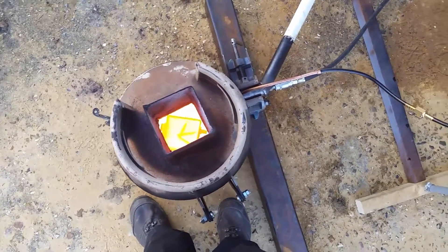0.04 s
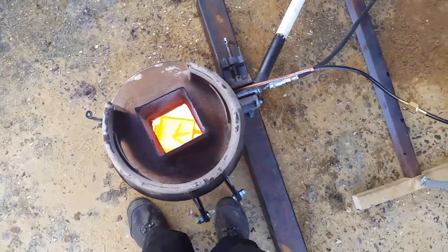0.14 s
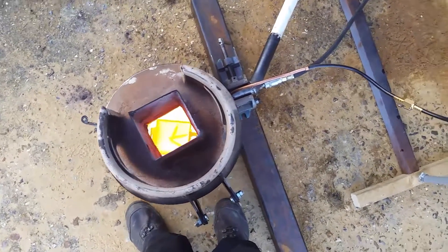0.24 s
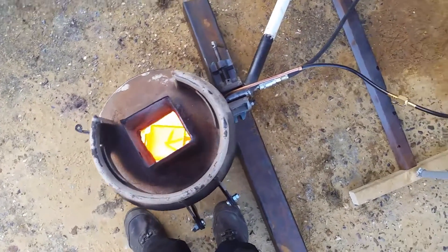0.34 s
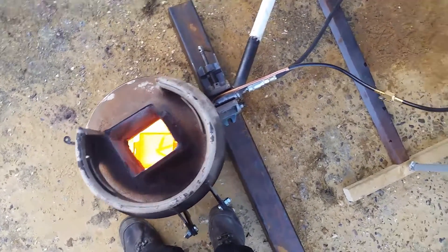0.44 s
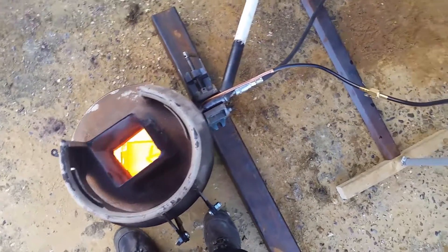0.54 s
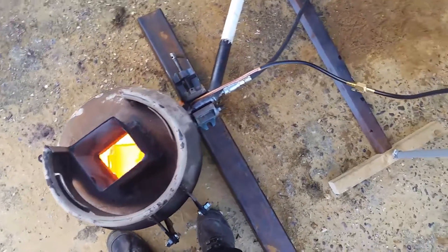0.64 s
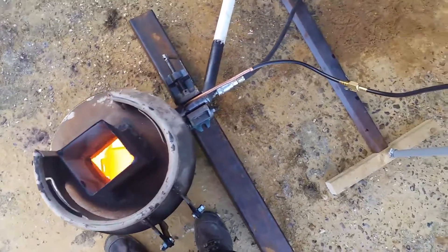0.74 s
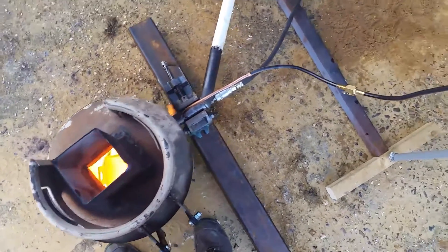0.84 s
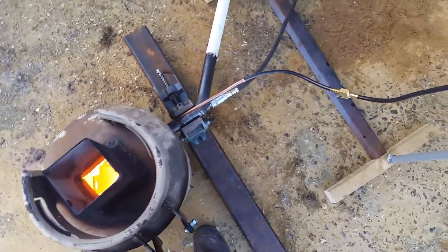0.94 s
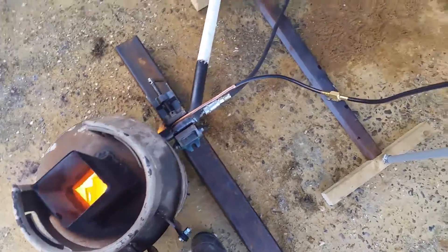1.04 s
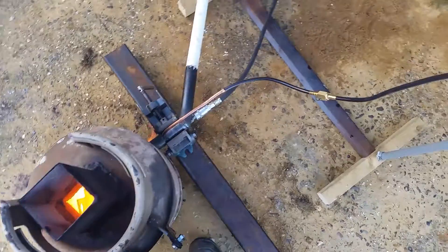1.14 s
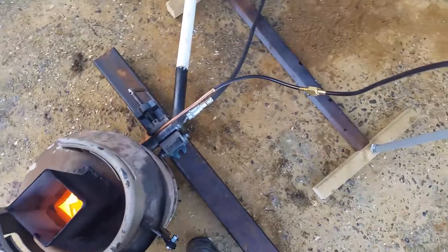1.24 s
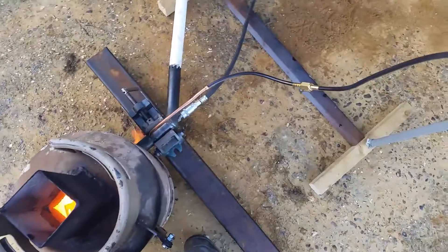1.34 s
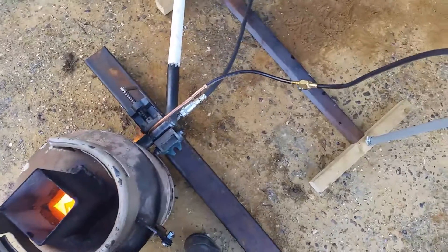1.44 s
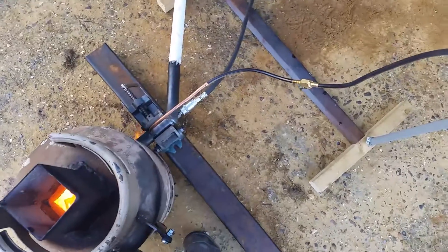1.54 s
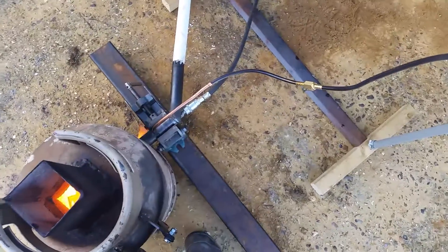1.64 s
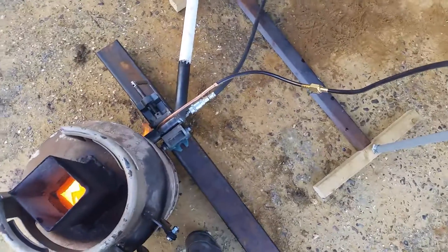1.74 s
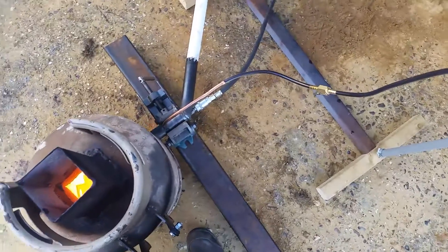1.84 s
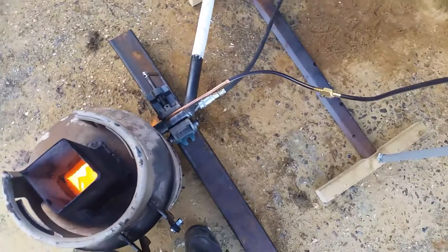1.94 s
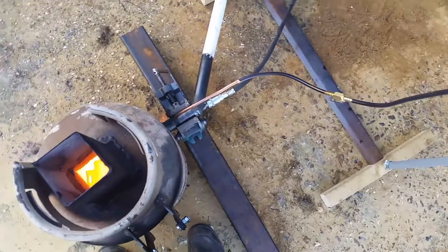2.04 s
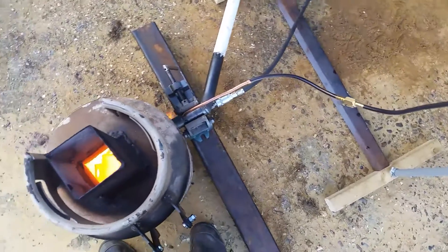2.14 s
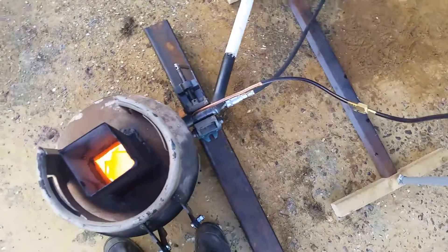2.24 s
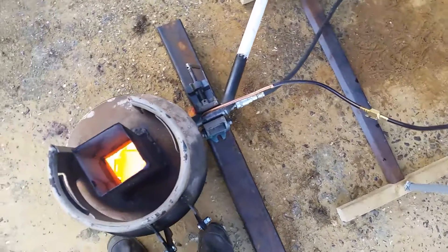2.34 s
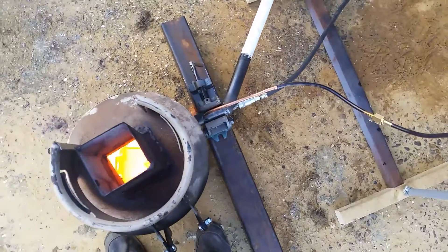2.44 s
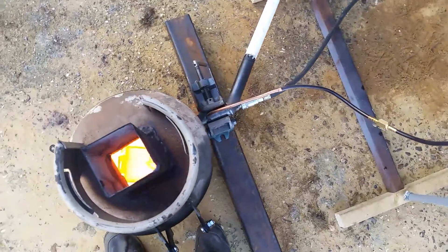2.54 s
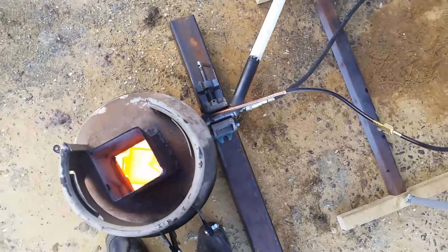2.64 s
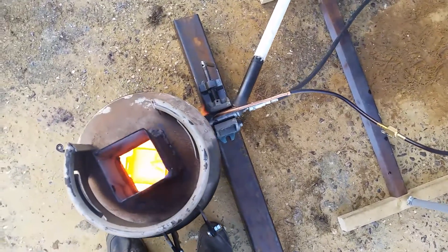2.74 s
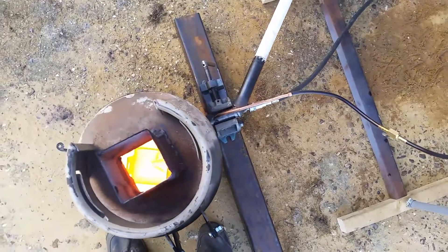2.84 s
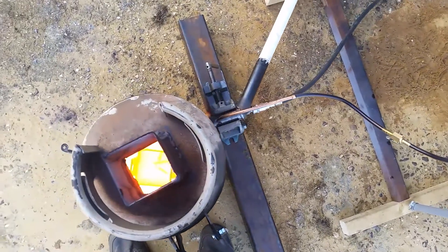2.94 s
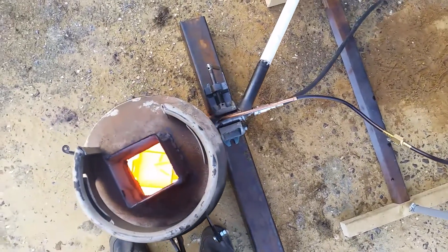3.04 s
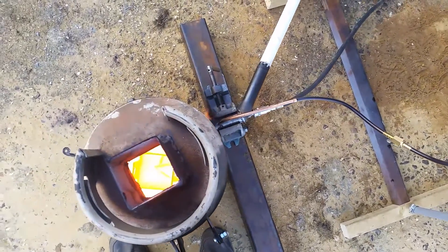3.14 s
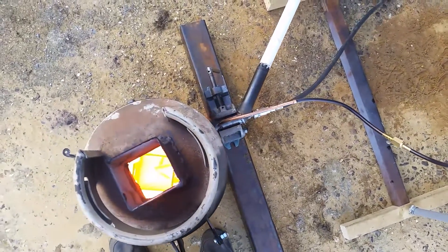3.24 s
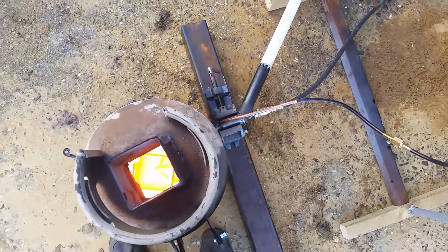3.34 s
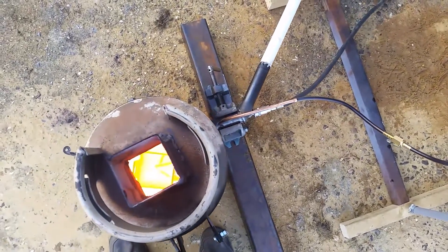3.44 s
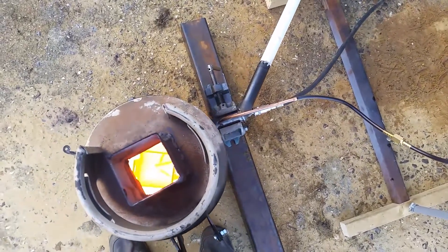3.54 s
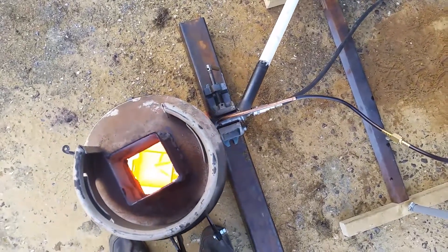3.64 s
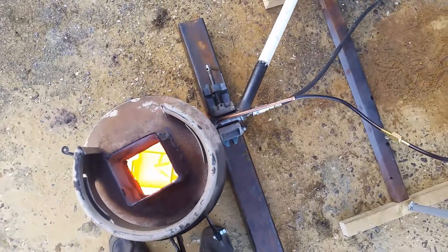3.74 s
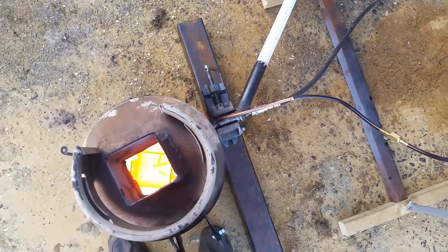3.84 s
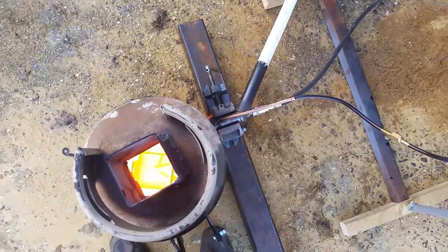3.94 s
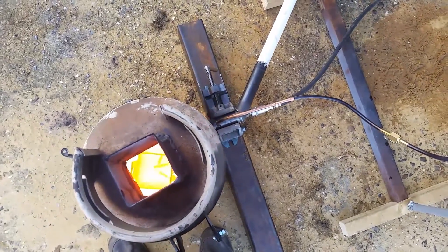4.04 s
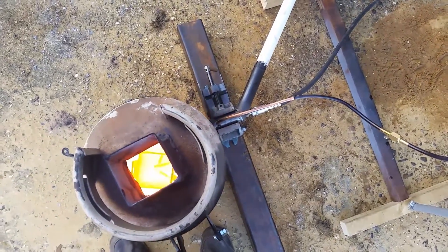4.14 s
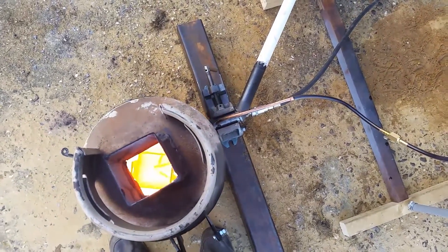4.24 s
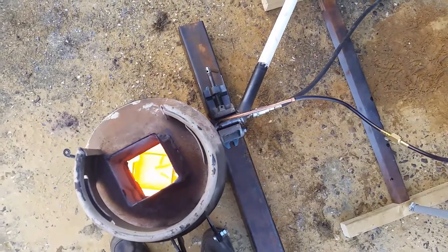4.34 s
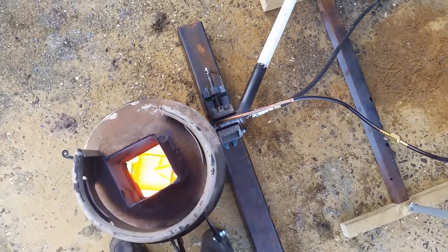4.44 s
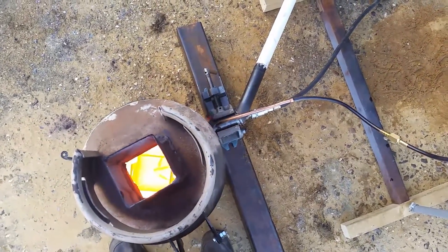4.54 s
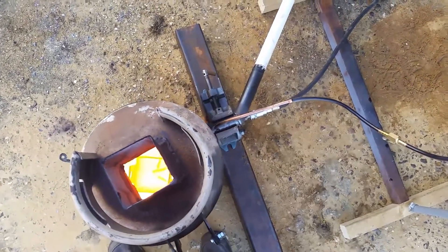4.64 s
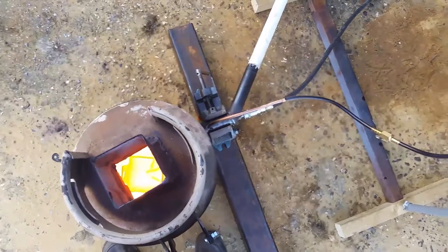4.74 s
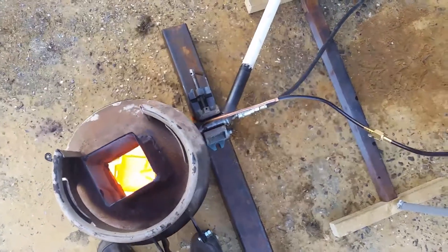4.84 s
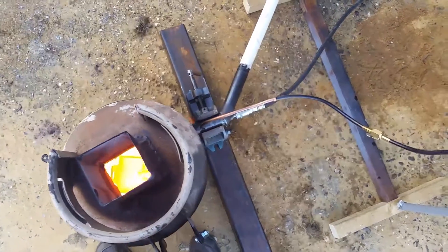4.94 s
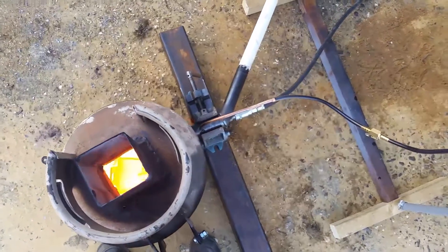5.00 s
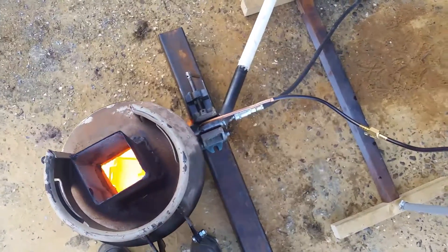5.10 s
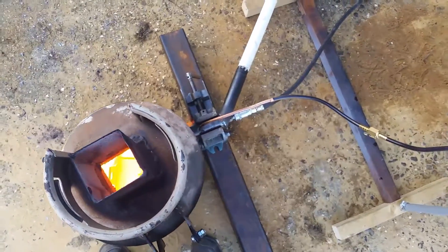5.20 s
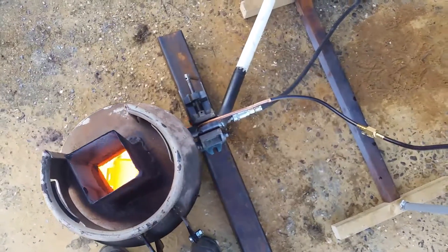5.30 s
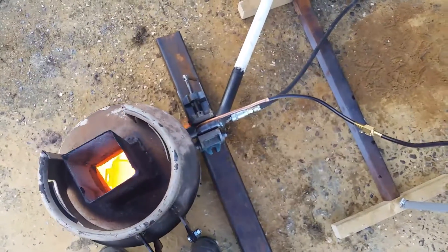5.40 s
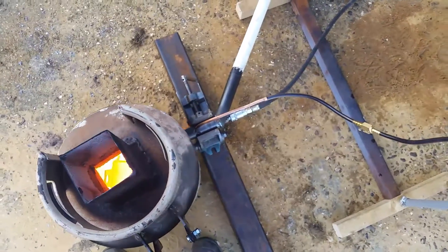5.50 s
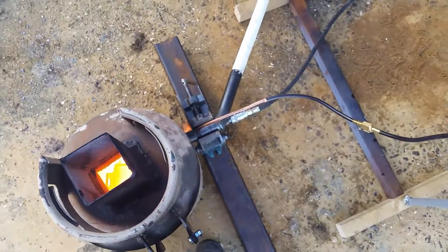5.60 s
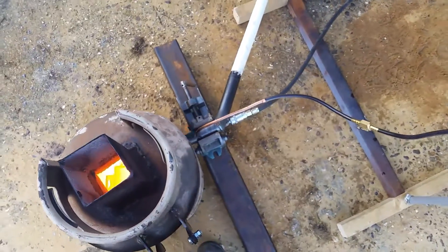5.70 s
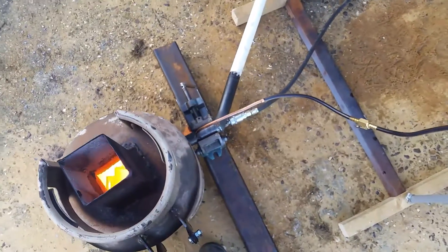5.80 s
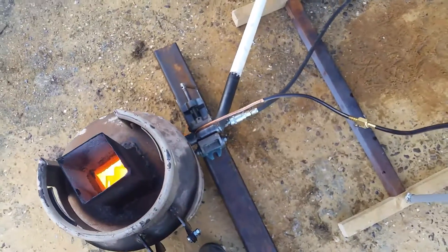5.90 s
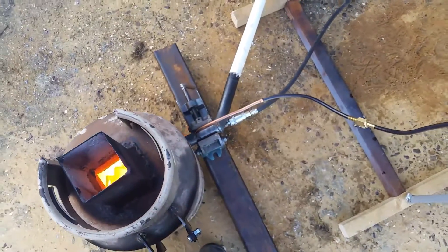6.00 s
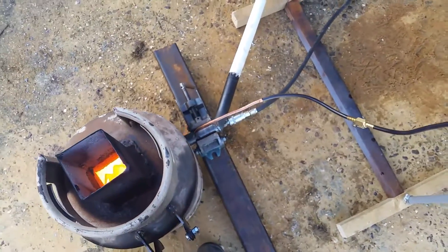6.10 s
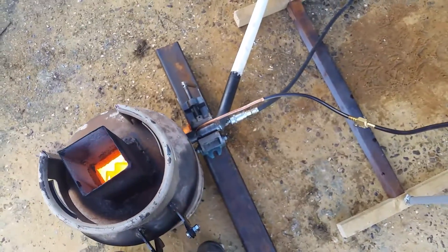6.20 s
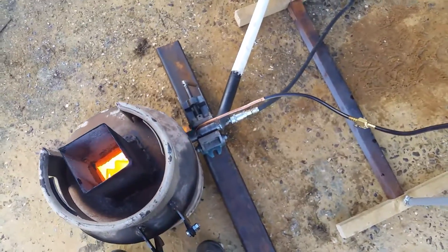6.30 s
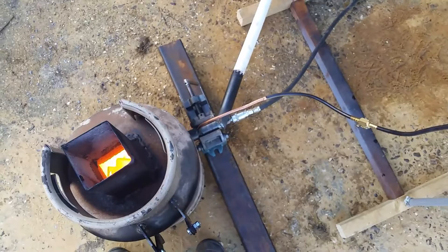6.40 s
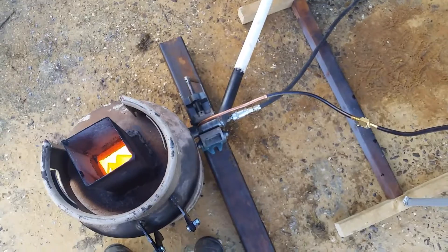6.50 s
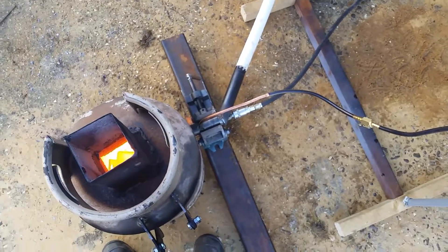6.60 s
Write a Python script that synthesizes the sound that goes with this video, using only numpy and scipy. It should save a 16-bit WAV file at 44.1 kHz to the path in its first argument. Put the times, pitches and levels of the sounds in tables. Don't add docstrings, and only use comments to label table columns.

```python
import sys
import numpy as np
from scipy import signal
from scipy.fft import rfft, irfft
from scipy.io import wavfile
from scipy.ndimage import uniform_filter1d

SR = 44100
rng = np.random.default_rng(int(sys.argv[2]) if len(sys.argv) > 2 else 0)


def elevation(decibels):
    levels = np.asarray(decibels, float)
    return 10 ** (levels / 20)


def wav_out(sig):
    wavfile.write(sys.argv[1], SR, np.round(np.clip(np.atleast_2d(sig).T, -1, 1) * 32767).astype(np.int16))


N = 293704


def evened(x):
    return x / np.sqrt(np.mean(x ** 2) + 1e-20)


def read(points, hz):
    f, *columns = np.transpose(points)
    at, known = np.log(hz + 1), np.log(f + 1)
    return np.array([np.interp(at, known, c, left=c[0], right=c[-1]) for c in columns])


def follow(rows, t):
    s, *columns = np.transpose(rows)
    return [np.interp(t, s, c) for c in columns]


def bumps(modes, hz):
    return sum(np.outer([left, right], 1 / (1 + (2 * (hz - f) / width) ** 2))
               for f, width, left, right in modes)


def wander(rate_hz, t, count=24):
    f = np.geomspace(rate_hz / 12, rate_hz, count)[:, None]
    waves = np.sin(2 * np.pi * (f * t + rng.random((count, 1))))
    return evened((waves / f ** 0.075).sum(0))


def passing(events, t):
    return sum(size_db * np.exp(-(2 * (t - s) / length) ** 2) for s, size_db, length in events)


def change(*levels_db):
    return np.array([level - level.mean() for level in levels_db])


def moved(layer, t):
    # time in seconds, overall level in dB, turn of the left port to the burner in dB
    hand_path = [(0, 0, -4), (.3, -1.5, -4.5), (.6, -0.5, -2.5), (.9, -2.5, -2.5), (1.15, -6.5, 2.5),
                 (1.45, -6.5, 5.5), (1.75, -2, 5.5), (2.0, -0.5, 5), (2.4, -0.5, 2), (2.9, -0.5, 1),
                 (3.4, 0, 0.5), (3.8, -0.5, 0.5), (4.2, -1, 0.5), (4.6, -1, 0.5), (5.0, -1.5, -2),
                 (5.5, -.5, 1.5), (6.1, -1, 4.5), (6.66, -1, 6.5)]
    # dB per dB of overall level, dB per dB of turn
    level_share = dict(roar=(1.02, .99), deep=(.5, .5), air=(1, 1), top=(.1, 0.2), hiss=(0.95, 1.03),
                  fizz=(.1, .1), blade=(.1, .1))
    turn_share = dict(roar=(-0.06, -.05), deep=(-.3, -0.27), air=(.4, 0.14), top=(0.25, -0.12),
                  hiss=(0.84, -.05), fizz=(0.22, .05), blade=(0.65, -.1))
    overall_db, turn_db = change(*follow(hand_path, t))
    return np.outer(level_share[layer], overall_db) + np.outer(turn_share[layer], turn_db)


def grid(size):
    return np.arange(4 * N // size + 5) * size / 4 / SR, np.fft.rfftfreq(size, 1 / SR)


def turbulence(field_db, size, patch_db, bins, frames):
    # frequency in Hz, likeness from 0 to 1
    port_likeness = [(30, 0.32), (60, 1), (150, 1), (450, 1), (600, 1), (850, 0.91), (1100, 0.7),
                     (2000, 0.3), (4000, 0.24), (16000, 0.38)]
    # frequency in Hz, lag of the right port in radians
    port_phase = [(30, 1.5), (100, 0.24), (300, 0.37), (600, -1.07), (1500, 0.99), (2200, 0.5), (3000, 2.5),
                  (4000, 2.5), (5000, 4), (7000, -0.5), (10000, 5.5), (16000, -4.5)]
    hz = grid(size)[1]
    a, b, c, d, patch = rng.standard_normal(field_db.shape[:0:-1] + (5,)).T
    patch = evened(uniform_filter1d(uniform_filter1d(patch, bins, 0), frames, 1))
    same = np.clip(read(port_likeness, hz)[0], 0, 1)[:, None]
    left = a + 1j * b
    shared = same * left * np.exp(-1j * read(port_phase, hz)[0])[:, None]
    right = shared + np.sqrt(1 - same ** 2) * (c + 1j * d)
    z = np.array([left, right]) * elevation(field_db + patch_db * patch) * np.sqrt(2 * SR / size)
    return signal.istft(z, nperseg=size, noverlap=3 * size // 4)[1][:, :N]


def flame():
    # frequency in Hz, left and right level in dB per Hz
    roar_spectrum = [(24, -72, -74), (42, -81, -79), (67.1, -39, -45), (86, -38, -39.5),
                     (137, -34.5, -38.5), (194, -37, -41), (261, -39, -43), (334, -46.5, -50),
                     (387.5, -54, -57.5), (565, -62, -62), (700, -73, -91), (900, -67.5, -78)]
    # frequency in Hz, width in Hz, left and right lift in dB
    chamber_modes = [(60, 14, 2, 2), (72, 12, -4, -4), (101, 9, -4, -4), (112, 10, 3.5, 3.5),
                     (124, 10, -4, -4), (137, 14, 2.5, 2.5), (152, 9, -4, -4), (172, 10, -4, -4),
                     (186, 11, 5, 5), (200, 10, -5, -5), (226, 25, -.5, -.5), (296, 12, -3, -3)]
    # time in seconds, swell in dB, length in seconds
    buffets = [
        (.3, 6, 0.23),
        (.67, 4, .1),
        (3.6, 11, .15),
        (4.2, 8, .25),
        (4.66, 8, .12),
        (4.9, -1, .2),
        (5.2, 8, 0.4),
    ]
    # time in seconds, swell in dB, length in seconds
    roar_dips = [
        (.73, -10, 0.04),
    ]
    pipe_s, pipe_echo = .0200, .2
    t, hz = grid(2048)
    deep_db = moved("deep", t) + passing(buffets, t) + 2.5 * wander(5, t)
    deep = np.clip((90 - hz) / 40, 0, 1)[:, None] * deep_db[:, None]
    shape_db = read(roar_spectrum, hz) - 60 * (hz > 1000)
    steady = turbulence(shape_db[:, :, None] + deep, size=2048, patch_db=0.96, bins=3, frames=4)
    f = np.fft.rfftfreq(N, 1 / SR)
    returned = pipe_echo * np.exp(-((f - 190) / 170) ** 2) * np.exp(-2j * np.pi * f * pipe_s)
    pipe = (1 - returned) * elevation(bumps(chamber_modes, f))
    now = np.arange(N) / SR
    flicker_db = np.interp(now, t, 0.28 * wander(5, t))
    level_db = moved("roar", now) + passing(roar_dips, now) + flicker_db
    return irfft(rfft(steady) * pipe, N) * elevation(level_db - 1.06)


def blower_air():
    # frequency in Hz, left and right level in dB per Hz
    air_spectrum = [(497, -83, -80), (720, -66.5, -67.5), (830, -64.5, -64), (950, -66.5, -64),
                    (1450, -72.5, -70), (1710, -72.5, -68.5), (2006, -71, -58), (1976, -77.5, -60),
                    (2137, -68.5, -72.5), (2550, -71.5, -69), (2630, -72.5, -72.5), (3730, -86, -72),
                    (3740, -77, -77.5), (4500, -102, -77)]
    # frequency in Hz, width in Hz, left and right lift in dB
    duct_notches = [(2540, 100, -14, -8.5), (3150, 270, 0, -3.5)]
    # time in seconds, swell in dB, length in seconds
    draughts = [
        (2.05, 0, 0.22),
        (3.15, 0.5, 0.17),
        (4.75, 0, .25),
        (6.3, 1, 0.26),
    ]
    # time in seconds, swell in dB, length in seconds
    wisps = [
        (.3, -2.5, 0.63),
        (3.15, 1.5, .25),
        (4.65, -1, 0.13),
        (5.3, 2.5, 0.39),
    ]
    t, hz = grid(512)
    port_drift = np.array([wander(3.3, t), wander(3, t)])
    moving = moved("air", t) + passing(draughts, t) + 0.74 * wander(25, t) + 0.35 * port_drift
    top_db = moved("top", t) + passing(wisps, t) * np.array([[.2], [1]]) + 0.57 * wander(2.7, t)
    top = np.clip((hz - 2200) / 400, 0, 1)[:, None] * top_db[:, None]
    outside = (hz < 400) | (hz > 4700)
    shape_db = read(air_spectrum, hz) + bumps(duct_notches, hz) - 60 * outside
    field_db = shape_db[:, :, None] + moving[:, None] + top
    return turbulence(field_db, size=512, patch_db=0.53, bins=3, frames=20)


def jet():
    # frequency in Hz, left and right level in dB per Hz
    hiss_spectrum = [(3670, -85, -85.5), (4430, -87, -70.5), (4650, -105, -69.5), (5080, -106, -64.5),
                     (5700, -107, -73), (6320, -93, -67.5), (6470, -79, -66.5), (7100, -84, -76),
                     (7450, -70.5, -75), (8760, -79.5, -74.5), (11400, -76.5, -73), (12600, -73, -76.5),
                     (14400, -76, -75), (16400, -70, -75)]
    # frequency in Hz, width in Hz, left and right lift in dB
    port_modes = [(5430, 270, 1, 4.5), (8250, 330, 7, -2.5), (10610, 1140, 3, 8.5), (13400, 220, -1, -1),
                  (13580, 220, -5, -4), (14300, 300, 4, 3.5)]
    # time in seconds, swell in dB, length in seconds
    shades = [(.11, -6, 0.11), (.56, 8, 0.1), (.8, -2, 0.091), (1.0, -6, .12), (3.0, -3, .06),
              (3.75, -5, 0.15), (4.03, -3, 0.074), (4.2, -2, 0.073), (4.44, -10, .12), (4.88, -1, .1),
              (5.1, -2, .1), (5.44, 0, .1), (5.85, -5, 0.17)]
    # time in seconds, swell in dB, length in seconds
    spits = [
        (.22, 4, 0.16),
        (.45, 1.5, 0.052),
        (2.7, 0.5, .15),
        (3.1, 1.5, 0.092),
        (3.9, 2.5, 0.2),
        (4.05, -2.5, 0.076),
        (4.45, 1, 0.34),
        (5.22, 4, 0.25),
    ]
    # time in seconds, swell in dB, length in seconds
    fizzes = [
        (.2, 7, .2),
        (2.7, 2, .12),
        (1.85, 2, .2),
        (4.1, -1, .2),
        (4.6, 1, .1),
        (5.2, 3, .08),
        (5.33, 5, .1),
        (5.55, 5, .12),
        (5.75, 5, .08),
        (6.6, 4, .1),
    ]
    # time in seconds, level in dB
    whistle_level = [(0, -26), (.25, -41), (.5, -36), (.85, -34.5), (1.2, -44), (1.55, -36.5), (1.9, -34),
                     (2.35, -34), (2.6, -43), (2.9, -32), (3.5, -33), (4.3, -32), (4.7, -36), (5.0, -38),
                     (5.2, -34), (5.55, -41), (6.1, -31.5), (6.66, -37)]
    whistle_hz = 6256
    ground_s, ground_echo = .0019, 0.17
    t, hz = grid(512)
    fizz_db = moved("fizz", t) + passing(fizzes, t) * np.array([[1], [.6]])
    sputter = 0.62 * wander(60, t) + 0.67 * np.array([wander(40, t), wander(40, t)])
    flares = np.array([passing(shades, t), passing(spits, t)])
    moving = moved("hiss", t) + flares + sputter + 0.75 * wander(7, t)
    fizz = np.clip((hz - 11000) / 1500, 0, 1)[:, None] * fizz_db[:, None]
    path_s = ground_s * (1 + 0.025 * np.array([wander(1.51, t), wander(1.5, t)]))
    echo = ground_echo * np.exp(2j * np.pi * hz[:, None] * path_s[:, None])
    comb_db = 20 * np.log10(abs(1 + echo))
    shape_db = read(hiss_spectrum, hz) + bumps(port_modes, hz) - 60 * (hz < 3600)
    field_db = shape_db[:, :, None] + moving[:, None] + fizz + comb_db
    hiss = turbulence(field_db, size=512, patch_db=1.17, bins=8, frames=8)
    b, a = signal.iirpeak(whistle_hz, whistle_hz / 150, SR)
    breath = rng.standard_normal((N, 2)).T
    whistle = evened(signal.lfilter(b, a, signal.lfilter(b, a, breath)))
    level_db = follow(whistle_level, t)[0] + 1.5 * wander(30, t) + 1.66 * wander(7, t)
    height = np.interp(np.arange(N) / SR, t, elevation(level_db))
    return hiss + whistle * height * elevation([[-17], [-.7]])


def blower_tones():
    # time in seconds, blade tone in dB, motor slot tone in dB
    rotor = [(0, -46, -44), (.3, -44.5, -41), (.6, -40.5, -44), (.9, -43.5, -70), (1.4, -42.5, -62),
             (1.8, -37, -59), (2.2, -37, -48.5), (2.8, -38.5, -48), (3.1, -41, -46.5), (3.7, -40.5, -46),
             (4.4, -43, -45), (5.0, -42.5, -47), (5.5, -37.5, -50), (6.1, -37, -51), (6.66, -37.5, -51)]
    orders = [.5556, 1, 1.2219, 1.831, 1.890, 2, 2.1925, 2.2219, 2.3327, 2.382, 2.4375, .7778, 5.610, 5.777]
    order_levels = [(-1.5, -6.5), (4.5, 3), (-9, -15), (-16, -10), (-25, -9), (-14, -3), (-25, -13),
                    (-2, 3), (-25, -9), (-19, -12), (-18, -12), (-8, -12), (-28, -8), (-28, -10)]
    blade_hz, blade_left_db = 928.9, -5
    slot_index = 7
    t, out = np.arange(N) / SR, np.zeros((2, N))
    coarse = t[::256]
    blade_db, slot_db = follow(rotor, coarse)
    blade_db = blade_db + moved("blade", coarse) + [[blade_left_db], [0]]
    for k, (order, port_db) in enumerate(zip(orders, order_levels)):
        for port in range(2):
            level_db = slot_db if k == slot_index else blade_db[port]
            waver = wander(9, coarse)
            height = np.interp(t, coarse, np.sqrt(2) * elevation(level_db + port_db[port] + 1.77 * waver))
            slip = np.interp(t, coarse, 0.16 * waver + 1.0 * port + k)
            out[port] += height * np.sin(2 * np.pi * order * blade_hz * t + slip)
    return out


def squeak():
    # time in seconds, pitch in Hz, level in dB
    skid = [
        (.7115, 1500, -45),
        (.7130, 1500, -22),
        (.7190, 1630, -16),
        (.7235, 1540, -18),
        (.7265, 1480, -30),
        (.7300, 1450, -50),
    ]
    t = np.arange(N) / SR
    hz, level_db = follow(skid, t)
    judder = evened(uniform_filter1d(rng.standard_normal(N), size=60))
    turns = np.cumsum(hz * (1 + .04 * judder)) / SR + np.array([[0], [.22]])
    touching = abs(t - .72) < .011
    return elevation(level_db + np.array([[-1.5], [.7]])) * np.sin(2 * np.pi * turns) * touching


def creak():
    # time in seconds, level in dB, ring in Hz, snap in dB over the ring
    slips = [(.7125, -24, 1450, 19), (.716, -19, 2420, 8), (.719, -21, 650, -20), (.7185, -17, 2450, 6),
             (.7215, -23, 2380, 12), (.727, -19, 1400, -12), (.733, -14, 1240, -7), (.7402, -8, 1200, -7),
             (.743, -18, 594, -15), (.7525, -13, 900, -12), (.7642, -7.5, 592, -30), (.7715, -10, 700, -30),
             (.7770, -11, 784, -30), (.7890, -8.5, 680, -27), (.7975, -16, 720, -30),
             (.8078, -10, 690, -39), (.8135, -12, 587, -26), (.8190, -17, 644, -21),
             (.8270, -16, 646, -34.5), (.8320, -24, 620, -35), (.8370, -20, 700, -30),
             (.8460, -23, 600, -38)]
    # frequency in Hz, width in Hz, left and right level in dB
    snap_modes = [(750, 540, 6, -3), (2500, 620, -5, -14), (3700, 980, -10, -12), (7400, 1400, 9, -10),
                  (10300, 1100, -2, -10), (12500, 1200, 1, -10), (15400, 1500, 7, -9)]
    ring_s, right_db = 0.017, -4.5
    out, t = np.zeros((2, N)), np.arange(3000) / SR
    f = np.fft.rfftfreq(len(t), 1 / SR)
    colour = sum(elevation([[left], [right]]) / (1 + (2 * (f - hz) / width) ** 2)
                 for hz, width, left, right in snap_modes)
    for s, level_db, ring_hz, snap_db in slips:
        turns = ring_hz * (t + np.array([[0], [.00012]]))
        modes = np.sin(2 * np.pi * turns) + 0.16 * np.sin(2 * np.pi * 1.2 * turns)
        onset = 1 - np.exp(-t / 0.00038)
        decay = elevation(-60 * t * np.square(ring_hz / 1000) / ring_s)
        ring = modes * onset * decay * elevation([[0], [right_db]])
        noise = irfft(rfft(rng.standard_normal((len(t), 2)).T) * colour, len(t))
        snap = noise / noise[0].std() * elevation(snap_db + 1.0 - 60 * t / 0.0064)
        at = round(s * SR)
        out[:, at:at + len(t)] += elevation(level_db) * (ring + snap)
    return out


def scene():
    return flame() + blower_air() + jet() + blower_tones() + squeak() + creak()


def starve(x, start_hz=2300, stop_hz=7300):
    hz, _, z = signal.stft(x, SR, nperseg=2048, noverlap=1536)
    power = uniform_filter1d(abs(z) ** 2, size=2, axis=2)
    band_db = 10 * np.log10(abs(uniform_filter1d(power, size=6, axis=1)) + 1e-14)
    around_db = uniform_filter1d(band_db, size=161, axis=1)
    weak = (band_db < around_db - 5.8) & (hz[:, None] > start_hz) & (hz[:, None] < stop_hz)
    return signal.istft(z * np.where(weak, .05, 1), SR, nperseg=2048, noverlap=1536)[1][:, :N]


def top_cut(x):
    return signal.sosfilt(signal.butter(12, 16650, fs=SR, output="sos"), x)


def record(dry):
    limited = starve(1.3 * np.tanh(dry / 1.3))
    edge = signal.firwin(1201, 15735, window=("kaiser", 5), fs=SR)
    mix = signal.oaconvolve(limited, edge[None], "same")
    return top_cut(mix)


dry = scene()
out = record(dry)
wav_out(out)
```